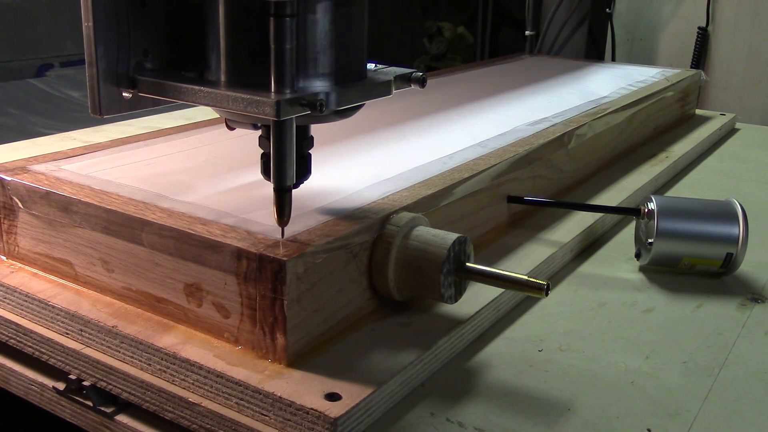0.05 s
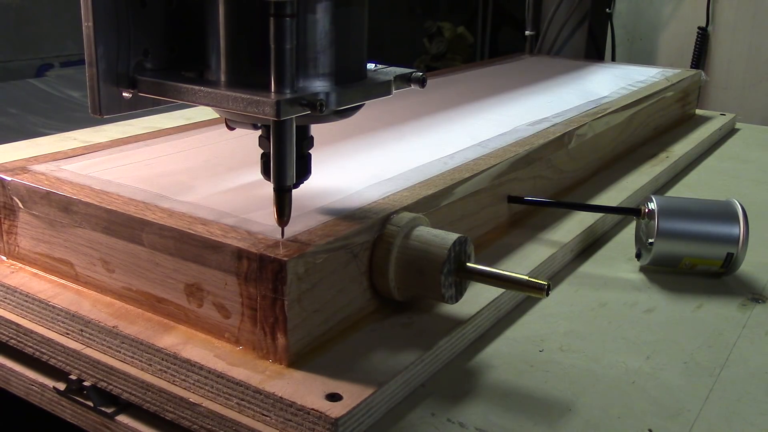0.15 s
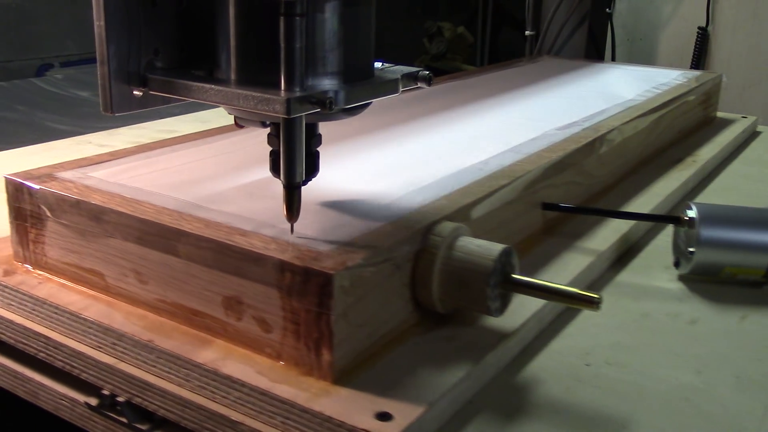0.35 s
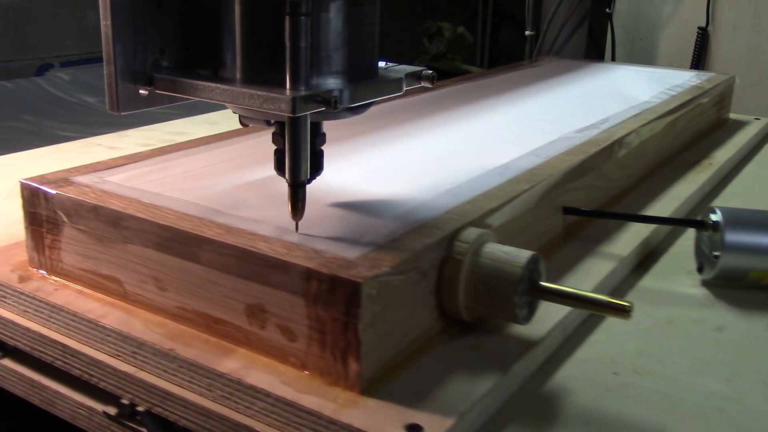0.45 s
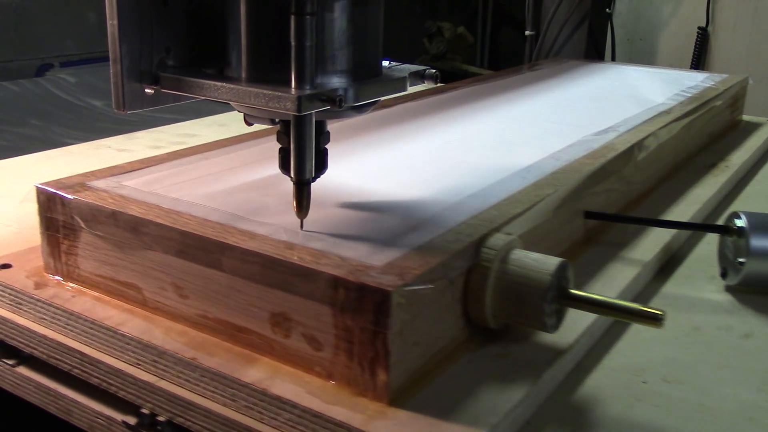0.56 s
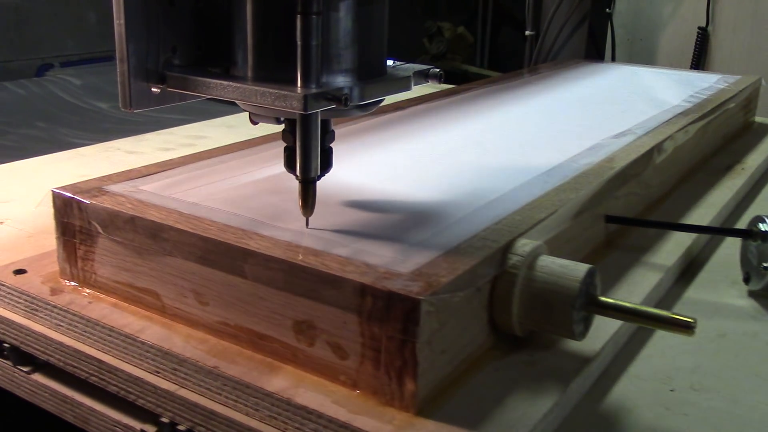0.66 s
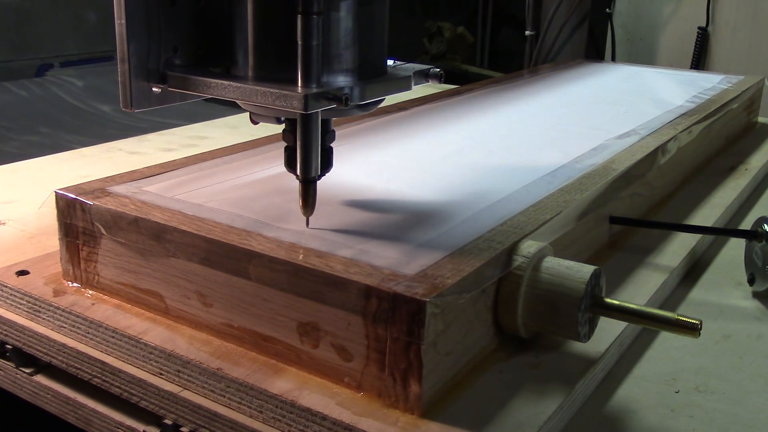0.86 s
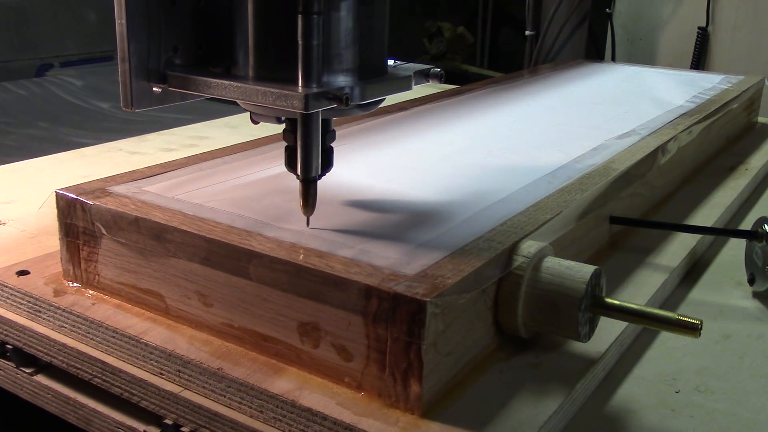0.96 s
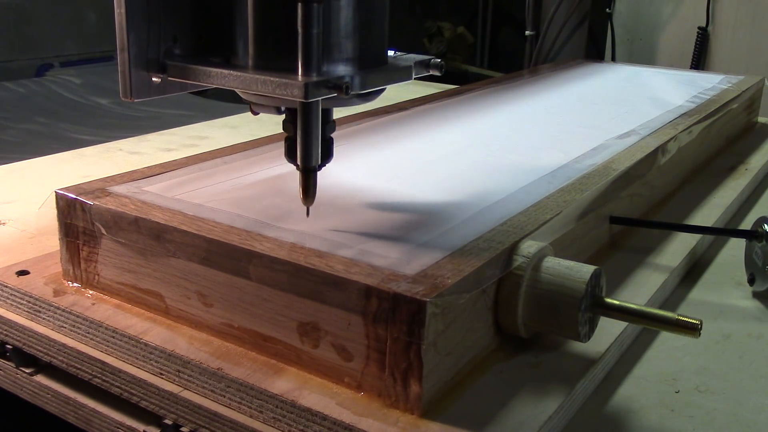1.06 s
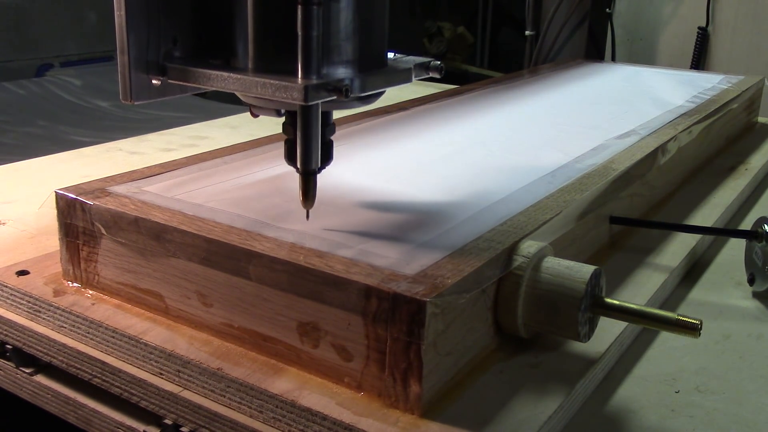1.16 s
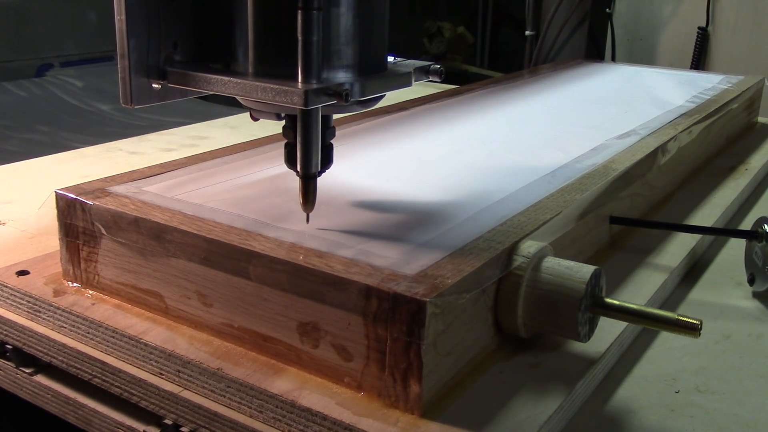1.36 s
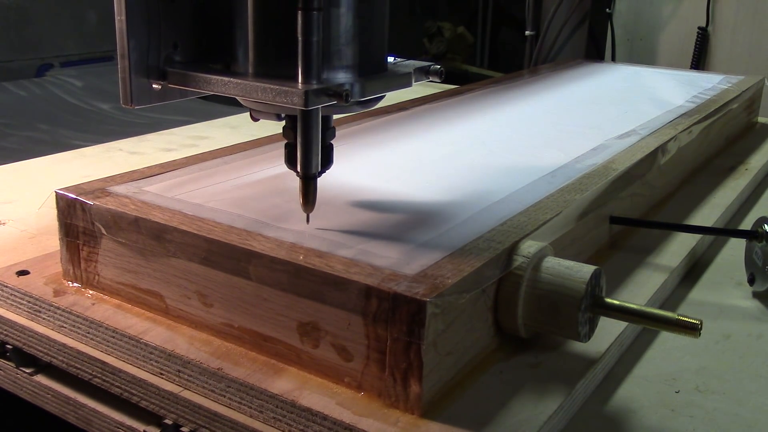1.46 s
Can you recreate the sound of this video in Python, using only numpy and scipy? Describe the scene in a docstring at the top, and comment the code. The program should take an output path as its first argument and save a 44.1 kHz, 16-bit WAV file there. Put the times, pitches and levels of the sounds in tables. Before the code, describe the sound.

Close up in a workshop, a machine's motor whines and its slide scrapes as a bearing squeals. The wooden table halts with a thump and a fading low ring, leaving faint rattles and a steady fan hum.

```python
"""A homemade plotter drives its wooden table through one move, close by in a workshop.
The motor whines at its mesh rate, the slide scrapes in dense tiny catches, a bearing squeals.
The table stops with a thump that rings the frame's modes; a low tone sinks away.
Loose parts rattle faintly over the fan noise and hum of the idle machine."""
import sys
import numpy as np
from scipy import signal
from scipy.fft import rfft, irfft
from scipy.io import wavfile

SR = 44100
rng = np.random.default_rng(int(sys.argv[2]) if len(sys.argv) > 2 else 0)


def dump_mix(stems):
    """Bounce the given channels to the path in sys.argv[1] as a 16-bit WAV at rate SR."""
    frames = np.atleast_2d(stems).T  # one column per channel
    limited = np.clip(frames, -1, 1)  # hard clip at full scale
    pcm = np.round(limited * 32767).astype(np.int16)
    wavfile.write(sys.argv[1], SR, pcm)


N = 66150

START_S, RAMP_UP_S, BRAKE_S, RAMP_DOWN_S = 0.19, 0.13, 0.6837, 0.12
SHAFT_HZ, MESH_ORDER = 57.74, 8  # shaft at full speed

# fan noise spectrum: f/Hz, density/dB
FAN_SPECTRUM = [(15, -79), (25, -43), (37, -30), (55, -27), (75, -30), (93, -18), (129, -7.5), (144, 4),
                (160, -15.5), (173, -11), (198, -3.5), (260, -7.5), (340, -3), (537, -11.5), (582, -14.5),
                (666, -10.5), (722, -15), (848, -15), (1050, -14.5), (1140, -16), (1490, -23),
                (2770, -28.5), (7100, -40), (10900, -43.5), (15500, -54)]
# idle hum: f/Hz, level/dB
HUM_TONES = [(70, -67), (120, -60), (147, -56), (191, -58)]
# stereo width of the reflections: f/Hz, side gain/dB
SIDE_SPECTRUM = [(60, -32), (200, -44), (500, -27), (1300, -24.5), (2300, -15), (4500, -15), (9000, -20.5),
                 (13000, -28)]
# drive taking up slack: t/s, level/dB
SLACK_TICKS = [(0.214, -45), (.218, -43), (0.2217, -38.5)]
# tick spectrum: f/Hz, density/dB
TICK_SPECTRUM = [(300, -20), (1500, -4), (3200, 0), (5500, -2.5), (8500, -4), (12000, -15), (15000, -26)]
# loose parts settling: t/s, level/dB, half-width/s, centre/Hz, Q
RATTLES = [(0.821, -50.5, 0.013, 1390, 1.7), (1.029, -46.5, 0.012, 1500, 2.1), (1.078, -64.5, .04, 4000, 1),
           (1.082, -69, 0.0055, 9500, 0.98), (1.104, -57, 0.014, 2080, 1.6),
           (1.226, -69.5, 0.0063, 9000, .9), (1.232, -61.5, 0.017, 3300, 1.5),
           (1.355, -71, 0.019, 2480, 2.8), (1.49, -66.5, 0.053, 4300, 0.61)]
# hollow table's boom: f/Hz, density/dB
BOOM_SPECTRUM = [(70, -45), (130, -5.5), (290, 6), (450, 5), (800, -7.5), (1600, -39), (5000, -44)]
# blows on the frame at the stop: t/s, level/dB
STOP_BLOWS = [(0.7037, -28), (0.7088, -31), (0.717, -50), (0.74, -45.5)]
# frame modes: f/Hz, relative level/dB, t60/s
FRAME_MODES = [(199.7, -29, 0.49), (299.2, -7, 0.31), (406.2, -6, 0.2), (450, -5, 0.29), (607, -8, 0.3),
               (699.4, 3.5, 0.079), (879, -1.5, 0.075), (1044, -5, 0.041), (1197, -1.5, 0.026),
               (1430, -1, 0.04), (1610, -4.5, 0.023), (1957, -3.5, 0.055), (2306, -21, 0.069),
               (3130, -9.5, 0.034)]
# rubbing squeaks of the drive: t/s, level/dB, half-width/s, f/Hz
SQUEAKS = [(0.266, -36, 0.017, 1092), (0.315, -37, 0.035, 1077), (0.381, -34.5, .018, 1028)]
# bearing squeal envelope: t/s, level/dB
SQUEAL_ENVELOPE = [(.355, -52), (.386, -37.5), (.414, -59), (.438, -33.5), (.455, -48), (.466, -33),
                   (.492, -53), (.51, -37), (.538, -34), (.562, -56), (.595, -32.5), (.62, -34),
                   (.648, -46.5), (.688, -36), (.7, -40)]
# slide under load: f/Hz, density/dB
RASP_SPECTRUM = [(250, -37), (700, 3), (1100, -2), (1900, -3.5), (3200, -2.5), (4500, -15.5),
                 (6500, -12), (14000, -38)]
# slide scrape through the table: f/Hz, density/dB
SCRAPE_SPECTRUM = [(60, -56), (110, -14), (190, -6), (300, 0.5), (480, 5.5), (720, -3), (1050, -3),
                   (1300, -4.5), (1580, -4.5), (1750, -8.5), (2150, -12.5), (2500, -11), (2800, -15),
                   (3200, -12.5), (4200, -23.5), (5200, -22.5), (5700, -21.5), (6800, -21), (7800, -27),
                   (9200, -30), (10500, -26), (12200, -35), (16000, -38)]
# shaft harmonics: order, relative level/dB
SHAFT_HARMONICS = [(10, -18.5), (12, -28), (13, -25.5), (15, -42), (16, -16), (18, -25), (22, -27),
                   (25, -24.5), (27, -22)]
# motor whine envelope: t/s, level/dB
WHINE_ENVELOPE = [(.35, -49), (.395, -34.5), (.425, -28), (.445, -26), (.453, -33), (.464, -25.5),
                  (.5, -26.5), (.517, -45), (.532, -25), (.572, -30), (.582, -28.5), (.594, -20),
                  (.606, -23.5), (.618, -45), (.69, -33.5)]


def undb(db):
    return 10 ** (np.asarray(db) / 20)


def unit_rms(x):
    return x / np.sqrt(np.mean(x ** 2))


def time_s():
    return np.arange(N) / SR


def noise():
    return rng.standard_normal(N)


def drift(rate_hz):
    """Smooth random signal, rms 1."""
    hz = np.arange(N + 1) * SR / (2 * N)
    spectrum = rfft(rng.standard_normal(2 * N)) * np.exp(-(hz / rate_hz) ** 2)
    return unit_rms(irfft(spectrum)[:N])


def colour(x, points):
    """Filter through (f/Hz, gain/dB) points."""
    hz, db = np.array(points).T
    bins_hz = np.arange(N // 2 + 1) * SR / N + 1
    return irfft(rfft(x) * undb(np.interp(np.log(bins_hz), np.log(hz), db)), N)


def shaped_noise(points):
    return unit_rms(colour(noise(), points))


def butter(x, order, hz, kind):
    return signal.sosfilt(signal.butter(order, hz, kind, fs=SR, output="sos"), x)


def hiss(hz, q):
    """Noise through one resonance twice, rms 1."""
    b, a = signal.iirpeak(hz, max(q, hz / (SR / 3)), fs=SR)
    return unit_rms(signal.lfilter(b, a, signal.lfilter(b, a, noise())))


def tone(hz):
    """Sine on a fixed or moving pitch, random phase, rms 1."""
    cycles = np.cumsum(np.broadcast_to(hz, N)) / SR
    return np.sqrt(2) * np.sin(2 * np.pi * (cycles + rng.random()))


def envelope(points, fade_s):
    """Gain from (t/s, level/dB) points, fading outside them."""
    at_s, db = np.array(points).T
    t = time_s()
    outside_s = abs(t - np.clip(t, at_s[0], at_s[-1]))
    return undb(np.interp(t, at_s, db)) * np.exp(-outside_s / fade_s)


def decay(start_s, t60_s):
    age_s = time_s() - start_s
    return (age_s >= 0) * np.exp(-np.log(1000) * abs(age_s) / t60_s)


def swell(peak_s, half_width_s):
    return np.exp(-((time_s() - peak_s) / half_width_s) ** 2)


def table_speed():
    """Trapezoid, 0-1."""
    t = time_s()
    return np.clip(np.minimum((t - START_S) / RAMP_UP_S, 1 - (t - BRAKE_S) / RAMP_DOWN_S), 0, 1)


def idle_machine(fan_db=-49, rise_db=2.5):
    """Wavering hum and fan noise; the noise is a little louder after the move."""
    rise = np.clip(time_s() / BRAKE_S - 0.5, 0, 1)
    fan = shaped_noise(FAN_SPECTRUM) * undb(fan_db + rise_db * rise + 0.2 * drift(23))
    hum = sum(tone(hz * (1 + 0.0079 * drift(8.1))) * undb(db + 2 * drift(5.9)) for hz, db in HUM_TONES)
    return fan + hum


def workshop(x, low_t60_s=0.48, high_t60_s=0.33, split_hz=1100):
    """Diffuse reflections, shorter in the treble."""
    low = butter(noise(), 2, split_hz, "low") * decay(0, low_t60_s)
    high = butter(noise(), 2, split_hz, "high") * decay(0, high_t60_s)
    response = unit_rms(low + high) / np.sqrt(N)
    return signal.fftconvolve(x, response)[:N]


def small_parts(jolt_hz=520, jolt_db=-36.5):
    """Slack is taken up with ticks and a dull jolt; loose parts settle after the stop."""
    out = sum(shaped_noise(TICK_SPECTRUM) * undb(db) * decay(at_s, t60_s=0.012)
              for at_s, db in SLACK_TICKS)
    out += hiss(jolt_hz, q=0.5) * undb(jolt_db) * decay(SLACK_TICKS[-1][0], t60_s=0.14)
    for at_s, db, half_width_s, hz, q in RATTLES:
        out += hiss(hz, q) * undb(db + drift(200)) * swell(at_s, half_width_s)
    return out


def ring_out(ring_hz=459, sag_hz_per_s=98, ring_db=-37, fade_s=0.64, boom_db=-32):
    """After the stop a low tone sinks away while the hollow table booms."""
    stop_s = STOP_BLOWS[0][0]
    age_s = time_s() - stop_s
    ring = tone(ring_hz - sag_hz_per_s * age_s + 7 * drift(30)) * (1 + 0.62 * drift(50))
    ring *= undb(ring_db) * decay(stop_s, t60_s=1.94) * np.exp(-(age_s / fade_s) ** 4)
    boom = shaped_noise(BOOM_SPECTRUM) * undb(boom_db) * decay(stop_s, t60_s=0.97)
    return butter(ring + boom, 3, 110, "high")


def thump(crack_hz=1150, crack_gain_db=1, contact_s=0.00027, detune=0.008):
    """The table stops and bounces; each blow cracks and rings the frame's modes."""
    out = 0
    for at_s, blow_db in STOP_BLOWS:
        modes = sum(undb(db) * decay(at_s, t60_s) * tone(hz * (1 + detune * rng.standard_normal()))
                    for hz, db, t60_s in FRAME_MODES)
        crack = undb(crack_gain_db) * hiss(crack_hz, q=1.0) * decay(at_s, t60_s=0.046)
        attack = 1 - np.exp(-abs(time_s() - at_s) / contact_s)
        out += undb(blow_db) * attack * (modes + crack)
    return butter(out, 3, 170, "high")


def drive_strain(jitter=0.017, brake_hz=8000, brake_db=-47):
    """The drive rubs and squeaks early in the move, then hisses as it brakes."""
    squeaks = 0
    for at_s, db, half_width_s, hz in SQUEAKS:
        squeak = tone(hz * (1 + jitter * drift(88))) * (1 + 0.5 * drift(120))
        squeaks += squeak * undb(db) * swell(at_s, half_width_s)
    brake = hiss(brake_hz, q=0.58) * undb(brake_db) * swell(peak_s=0.674, half_width_s=0.014)
    return squeaks + brake


def bearing(squeal_hz=1940, trim_db=-0.5, jitter=0.0046, roughness=0.08):
    """A thin squeal that comes and goes."""
    gain = undb(trim_db) * envelope(SQUEAL_ENVELOPE, fade_s=0.0089) * (1 + roughness * drift(88))
    return gain * tone(squeal_hz * (1 + jitter * drift(53)))


def slide_rasp(speed, rasp_db=-39):
    """Extra bite of the slide under load as the table comes up to speed."""
    load = swell(peak_s=0.286, half_width_s=0.062)
    return shaped_noise(RASP_SPECTRUM) * speed * load * undb(rasp_db + 3.1 * drift(200))


def slide_scrape(speed, scrape_db=-30, catches_per_s=3000, spread_db=0.5, speed_exponent=1.34):
    """Dense catches of the slide, pulsing with each shaft turn, heard through the table."""
    catches = (rng.random(N) < catches_per_s / SR) * np.sign(noise())
    catches *= undb(spread_db * np.minimum(rng.exponential(size=N), 3))
    force = unit_rms(catches) + 0.74 * noise()
    force *= 1 + 0.067 * tone(SHAFT_HZ * (1 + 0.01 * drift(51)))
    return unit_rms(colour(force, SCRAPE_SPECTRUM)) * undb(scrape_db) * speed ** speed_exponent


def motor(speed, wobble=0.0058, roughness=0.16, beat_hz=29, beat_db=-10, harmonics_db=-24, flutter=0.24):
    """Rough, beating whine at the mesh rate; weaker shaft harmonics swell in mid-move."""
    shaft_hz = SHAFT_HZ * (1 + wobble * drift(24.4))
    mesh_hz = MESH_ORDER * shaft_hz
    whine = tone(mesh_hz) + undb(beat_db) * tone(mesh_hz + beat_hz + 5 * drift(43))
    whine *= envelope(WHINE_ENVELOPE, fade_s=0.054) * (1 + roughness * drift(130))
    harmonics = sum(undb(db) * (1 + flutter * drift(25)) * tone(order * shaft_hz)
                    for order, db in SHAFT_HARMONICS)
    return whine + harmonics * undb(harmonics_db) * speed * swell(peak_s=0.53, half_width_s=0.27)


def scene(wet_db=-8.5, left_db=1.17, right_db=1.0):
    """One move in mid/side stereo; reflections supply the side."""
    speed = table_speed()
    contacts = slide_scrape(speed) + slide_rasp(speed) + drive_strain() + thump() + small_parts()
    tones = motor(speed) + bearing()
    mid = contacts + tones + undb(wet_db) * workshop(contacts) + ring_out() + idle_machine()
    side = colour(workshop(mid), SIDE_SPECTRUM)
    return np.array([(mid + side) * undb(left_db), (mid - side) * undb(right_db)])


def record(dry):
    """Steep low-pass at 15.7 kHz."""
    return signal.sosfilt(signal.ellip(10, 0.1, 80, 15700, fs=SR, output="sos"), dry)


dry = scene()
out = record(dry)
dump_mix(out)
```